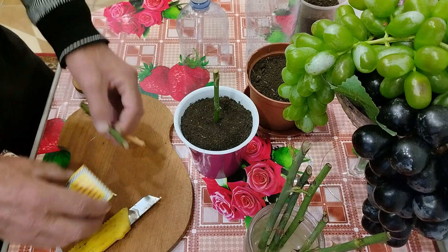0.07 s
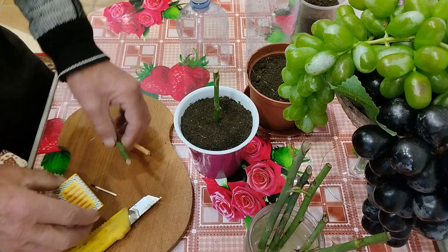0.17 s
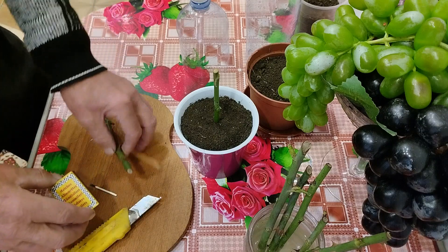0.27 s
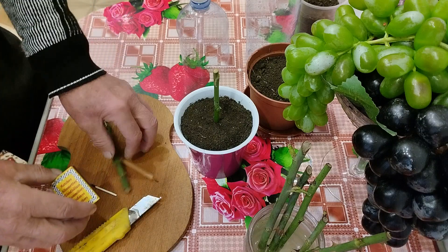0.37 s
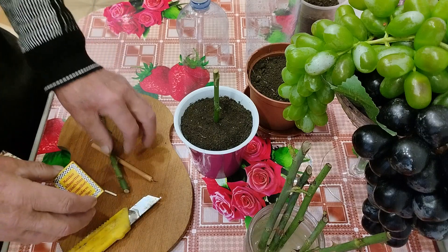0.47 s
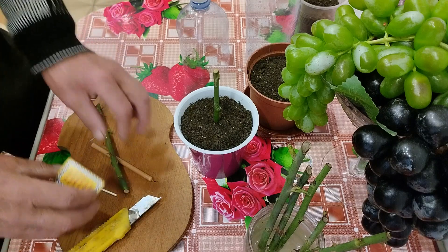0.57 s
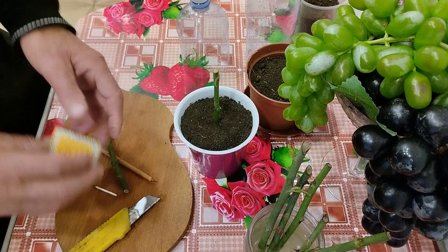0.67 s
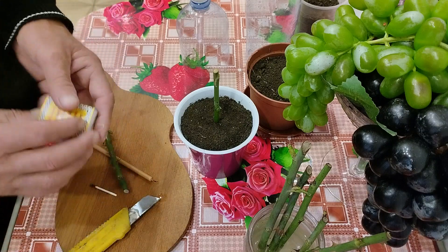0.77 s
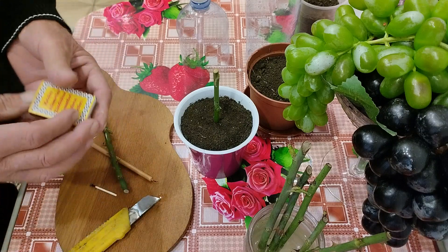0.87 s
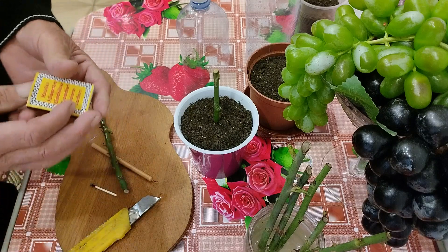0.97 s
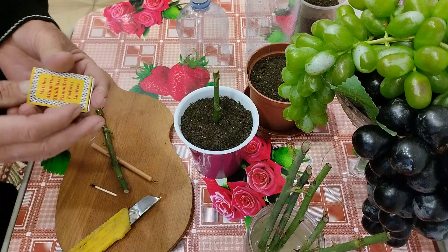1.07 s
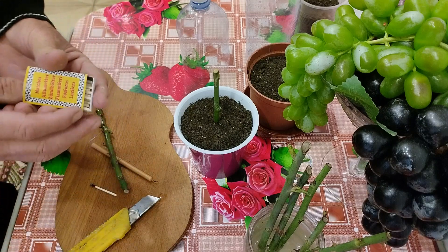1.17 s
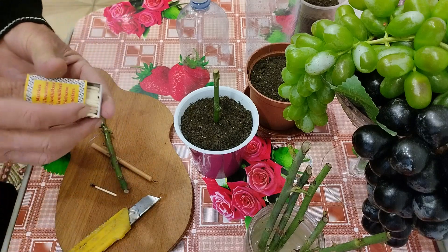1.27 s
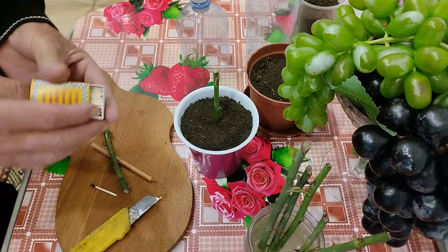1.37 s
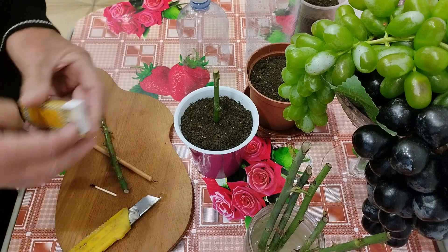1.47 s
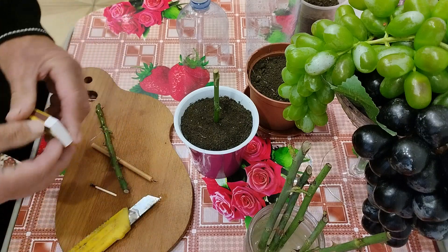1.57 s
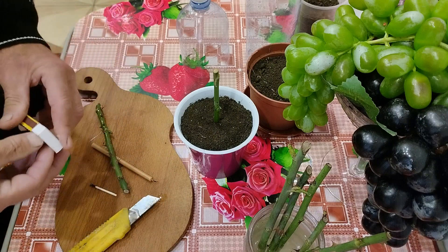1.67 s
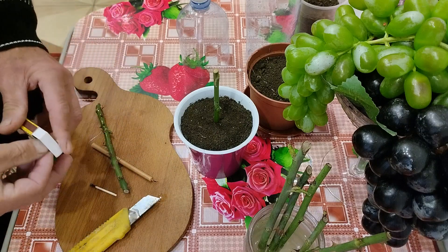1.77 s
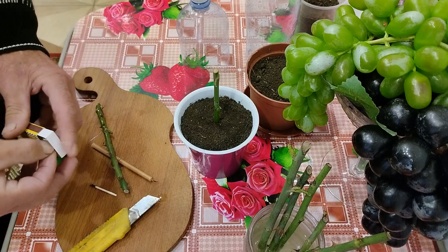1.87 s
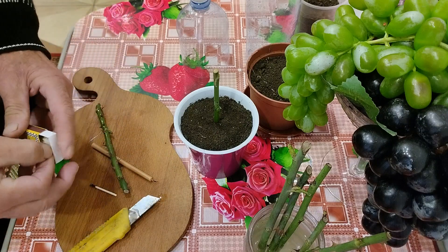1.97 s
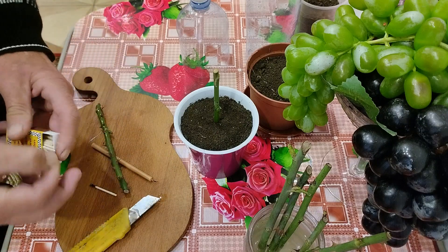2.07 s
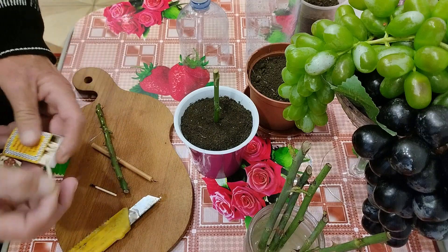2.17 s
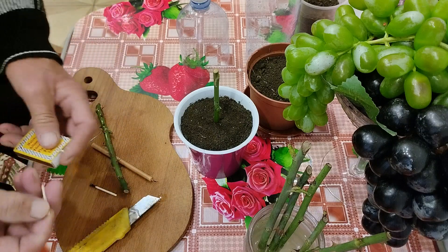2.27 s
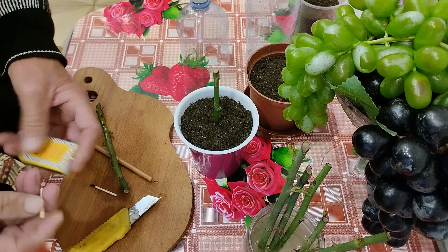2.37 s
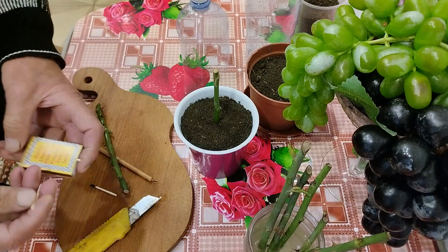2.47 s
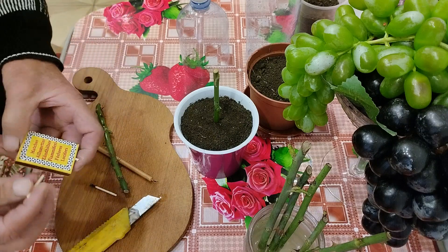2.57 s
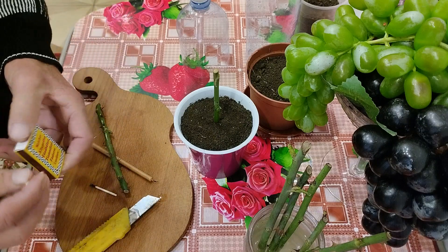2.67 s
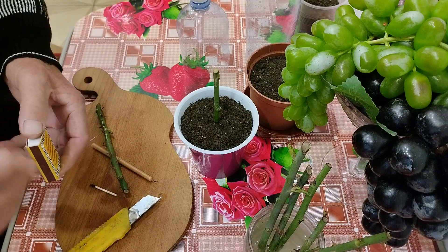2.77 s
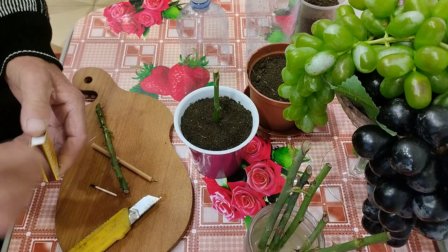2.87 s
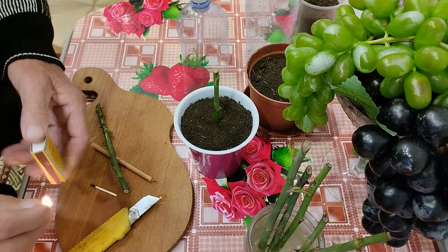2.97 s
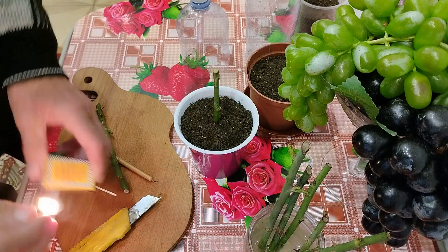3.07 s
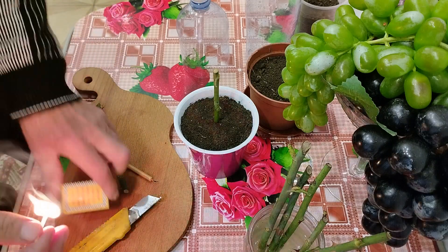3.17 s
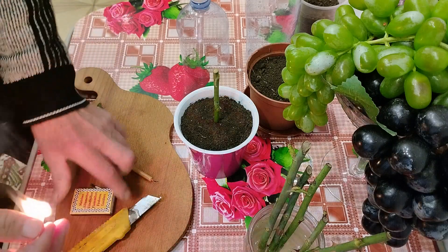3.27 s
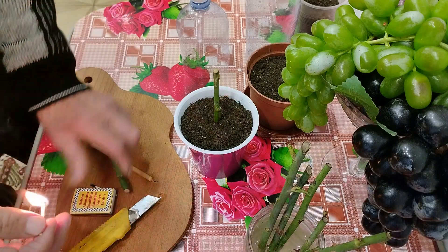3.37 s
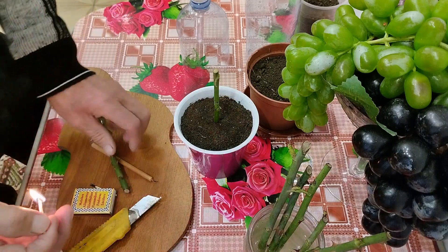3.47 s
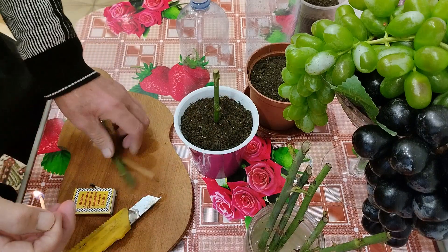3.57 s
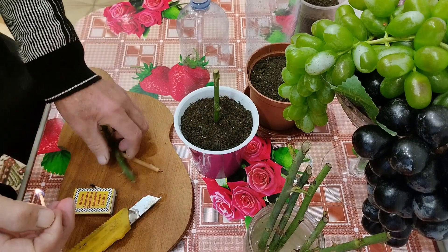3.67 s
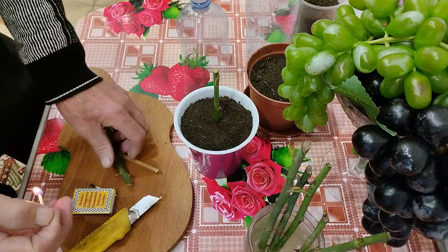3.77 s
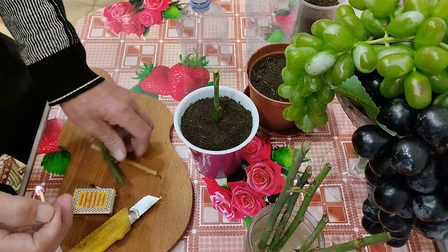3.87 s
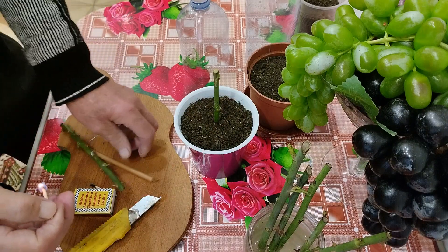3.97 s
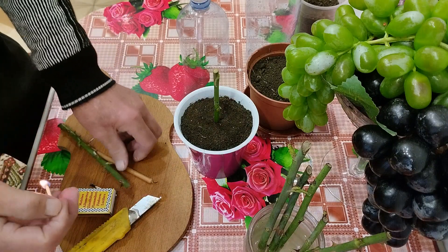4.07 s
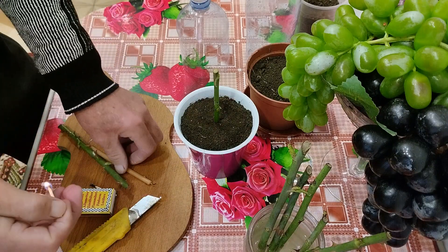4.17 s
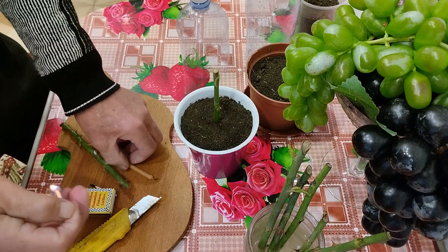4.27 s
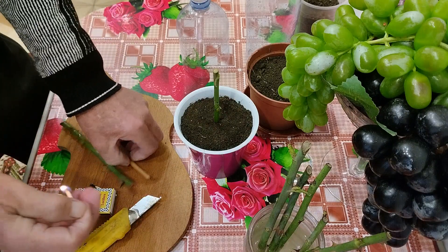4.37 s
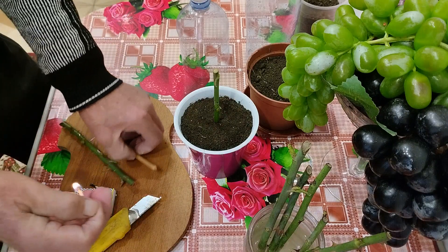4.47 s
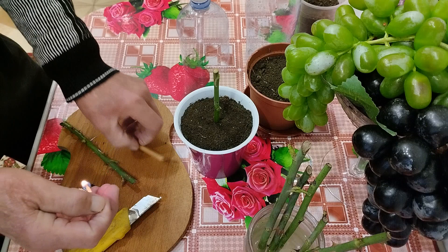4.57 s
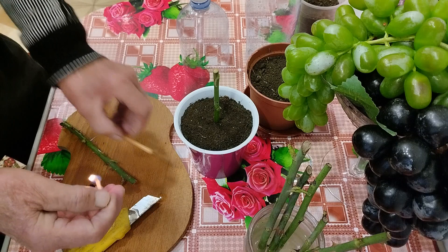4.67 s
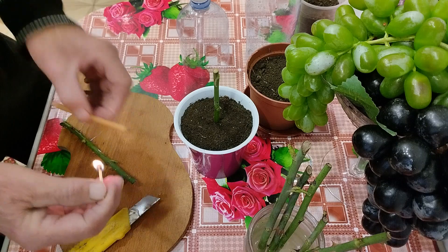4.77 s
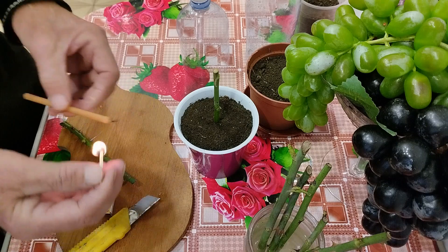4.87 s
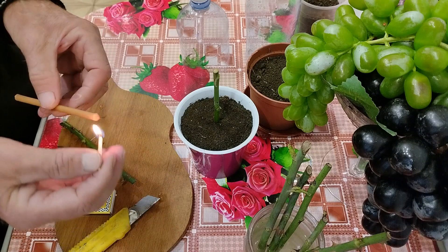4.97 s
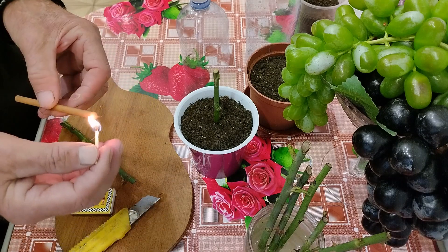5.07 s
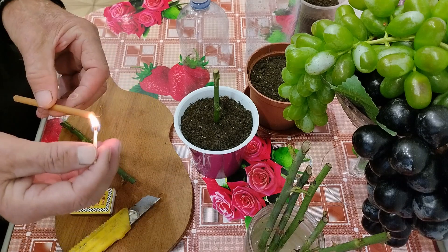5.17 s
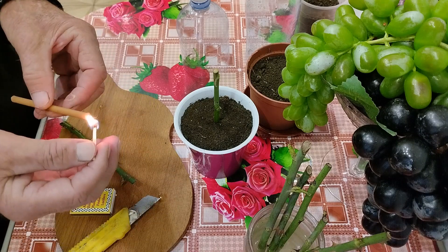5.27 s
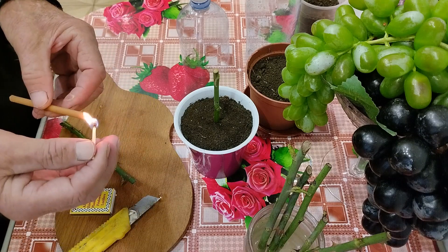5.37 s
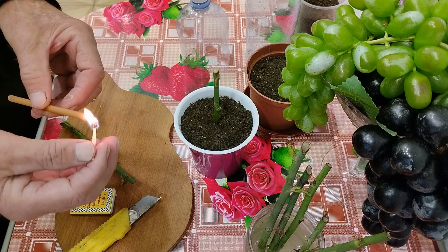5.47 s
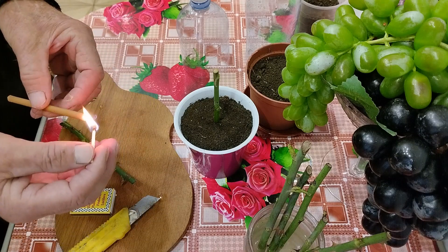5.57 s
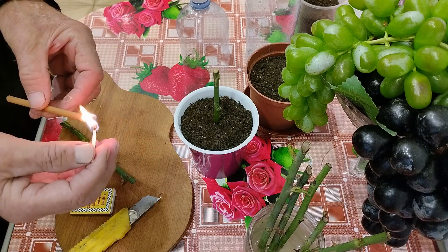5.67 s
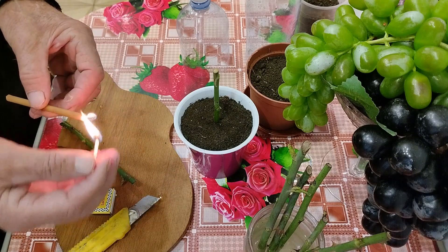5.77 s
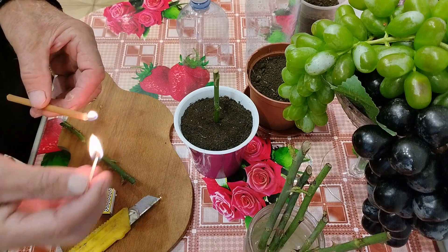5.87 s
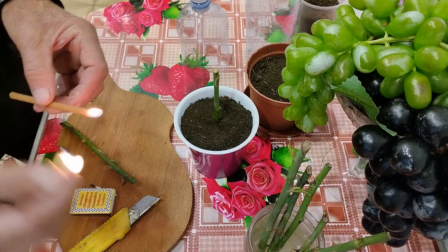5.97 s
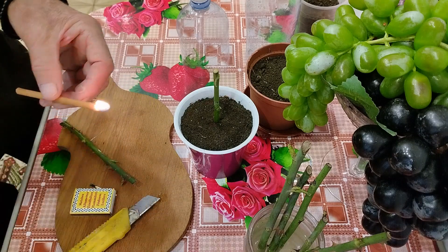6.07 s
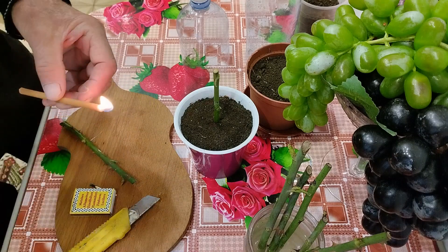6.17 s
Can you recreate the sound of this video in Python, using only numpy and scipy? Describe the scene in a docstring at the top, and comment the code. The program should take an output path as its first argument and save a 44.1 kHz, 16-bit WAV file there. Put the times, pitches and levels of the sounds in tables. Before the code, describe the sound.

Close view of a tabletop in a small quiet room, with a faint distant steady tick and low hum. A woody cutting drops and bounces on a board. A cardboard matchbox slides open, matches tick as one is picked out, and the tray clicks shut. A quick rasp and snap light the match, with a brief fizz and pop. The box lands with a sharp rattling knock, then fingers tap and brush the board, leaving near silence.

```python
"""A faint, evenly repeating far tick, perhaps a clock, runs through a small room. A vine cutting drops on a board:
decaying noise bursts through stem and board resonances; the board thuds. A matchbox slides open, a match is picked
out, the tray is pushed shut: card friction made of tiny slips, clicks and random match ticks. The match rasps,
snaps and flares as shaped friction; its wood pops in pitched bursts. The box lands with knocks and a rattle of
matches, then fingers bump and brush the board to pick up a stick. Air noise, hum and short echoes surround it all."""
import sys
import numpy as np
from scipy import signal
from scipy.fft import rfft, irfft, next_fast_len
from scipy.io import wavfile

SR = 44100
rng = np.random.default_rng(int(sys.argv[2]) if len(sys.argv) > 2 else 0)


def unload_wav(signal):
    """Save mono or channel-first audio to the path in sys.argv[1] as 16-bit WAV at rate SR, clipped to [-1, 1]."""
    wavfile.write(
        sys.argv[1],
        SR,
        np.round(np.clip(np.atleast_2d(signal).T, -1, 1) * 32767).astype(np.int16),
    )


N = 273861
TOP_HZ = 15900


def amp(db):
    """Decibels to gain."""
    return 10 ** (np.asarray(db) / 20)


def unit(x):
    """x at rms 1."""
    return x / np.sqrt(np.mean(x ** 2) + 1e-20)


def along(points, hz):
    """(frequency [Hz], value) points interpolated on a log frequency axis."""
    f, v = np.transpose(points)
    return np.interp(np.log(hz + 1), np.log(f + 1), v)


def wobble(knots_per_s, size=N):
    """Smooth random curve through normally distributed knots."""
    place = np.arange(size) * knots_per_s / SR
    knots = rng.standard_normal(int(place[-1]) + 2)
    i = place.astype(int)
    blend = np.sin((place - i) * np.pi / 2) ** 2
    return knots[i] + (knots[i + 1] - knots[i]) * blend


def body(spectrum, resonances=(), size=8192):
    """Minimum-phase impulse response of energy 1: a broad spectrum with resonances on it."""
    hz = np.fft.rfftfreq(size, 1 / SR)
    db = along(spectrum, hz)
    for centre_hz, width_hz, lift_db in resonances:
        db = db + lift_db / (1 + (2 * (hz - centre_hz) / width_hz) ** 2)
    # fold the cepstrum to make the response causal
    cepstrum = irfft(np.log(amp(db) + 1e-6))
    cepstrum[1:size // 2] *= 2
    cepstrum[size // 2 + 1:] = 0
    response = irfft(np.exp(rfft(cepstrum)))
    return response / np.linalg.norm(response)


def through(x, response):
    """x sounding through an impulse response."""
    return signal.oaconvolve(x, response)[:len(x)]


def fade(t, t60_s):
    """Exponential decay by 60 dB in t60_s."""
    return np.exp(-np.log(1000) * t / np.maximum(t60_s, 1e-4))


def add(track, s, sound):
    """Mix a sound into the track at time s."""
    part = track[max(round(s * SR), 0):][:len(sound)]
    part += sound[:len(part)]


def envelope(attack_s, hold_s, release_s):
    """Pressure builds, holds and lets go in straight lines."""
    corners_s = np.cumsum(np.abs([0, attack_s, hold_s, release_s]))
    t = np.arange(int(corners_s[-1] * SR)) / SR
    return np.interp(t, corners_s, [0, 1, 1, 0])


def strokes(rows, release_s):
    """The pressure of a series of hand strokes."""
    pressure = np.zeros(N)
    for s, attack_s, hold_s, db in rows:
        add(pressure, s, amp(db) * envelope(attack_s, hold_s, release_s))
    return pressure


def contacts(rows, bright, low, bright_db, low_db, low_stretch):
    """Each contact is a brief rough force: it clicks at the surface and knocks the body a little longer."""
    track, t = np.zeros(N), np.arange(SR // 5) / SR
    for s, click_db, knock_db, t60_s in rows:
        click = bright, click_db + bright_db, t60_s
        knock = low, knock_db + low_db, t60_s * low_stretch
        for response, db, life_s in (click, knock):
            force = fade(t, life_s)
            swell = 1 - fade(t, life_s / 2)  # surfaces give way before they push back
            sound = through(swell * force * rng.standard_normal(len(t)), response)
            add(track, s, amp(db) * sound * np.linalg.norm(force) / np.linalg.norm(sound))
    return track


def friction(s, pressure, response, slips_per_s, spread_db, smooth, flutter_db):
    """Tiny slips of random size and pitch over a smooth rub; follows the pressure from time s."""
    size = len(pressure)
    count = int(slips_per_s * size / SR) + 1
    start, pitch, chance, phase = rng.random((count, 4)).T[:, :, None]
    age = np.arange(SR // 400)
    strength = amp(spread_db * np.minimum(-np.log(1 - chance), np.pi))
    tone = np.sin(2 * np.pi * (pitch * TOP_HZ * age / SR + phase))
    grains = strength * fade(age / SR, 0.0017) * tone
    places = (start * size).astype(int) + age
    slips = np.bincount(places.ravel(), grains.ravel(), size)[:size]
    rub = unit(through(unit(slips) + smooth * rng.standard_normal(size), response))
    flutter = amp(flutter_db * wobble(70, size=size))
    track = np.zeros(N)
    add(track, s, pressure * flutter * rub)
    return track


# Noise spectrum: (frequency [Hz], relative level [dB])
AIR_SPECTRUM = [(20, -2), (45, -4), (65, -12.5), (150, -11.5), (230, -18), (380, -15), (600, -24),
                (1000, -27), (2000, -31.5), (4000, -37.5), (6500, -37), (9000, -34), (12000, -40),
                (16000, -38)]
# Hiss resonance: (centre [Hz], width [Hz], lift [dB])
HISS_RESONANCE = [(9000, 1600, 4)]


def background():
    """Still room air and microphone hiss as shaped noise, with a low wavering hum."""
    air = unit(through(rng.standard_normal(N), body(AIR_SPECTRUM, HISS_RESONANCE)))
    hum = np.sin(2 * np.pi * 48.2 * np.arange(N) / SR + .45 * wobble(10))
    return amp(-64.5) * air + amp(-65.5 + 1.4 * wobble(12)) * hum


# Room decay: (frequency [Hz], t60 [s])
ROOM_DECAY = [(150, 0.25), (1000, 0.27), (2500, .25), (8000, 0.15), (15000, 0.15)]


def room(x, count=20):
    """Short dense echoes from table and walls; a new random tail serves each equal block."""
    wet, step = np.zeros(N), N // count + 1
    for start in range(0, N, step):
        hz, t, z = signal.stft(rng.standard_normal(SR // 2), SR, nperseg=256)
        decay = fade(t, along(ROOM_DECAY, hz)[:, None])
        tail = signal.istft(z * decay, SR, nperseg=256)[1]
        echo = signal.fftconvolve(x[start:start + step], tail / np.linalg.norm(tail))
        add(wet, start / SR + 0.0022, echo)
    return wet


# Tick spectrum: (frequency [Hz], relative level [dB])
TICK_SPECTRUM = [(300, -23), (800, 2), (1300, -5.5), (2500, -9.5), (5000, -25.5)]
# Hollow case resonances: (centre [Hz], width [Hz], lift [dB])
CASE_RESONANCES = [(824, 130, 12), (1770, 310, 8.1)]
FIRST_TICK_S, TICK_PERIOD_S, TICK_DB = .262, .767, -66.5


def ticking():
    """Each far tick arrives as a dull, smeared knock of a hollow case."""
    track, t = np.zeros(N), np.arange(SR // 2) / SR
    for s in np.arange(FIRST_TICK_S, N / SR, TICK_PERIOD_S):
        add(track, s, amp(TICK_DB) * fade(t, .33) * rng.standard_normal(len(t)))
    return through(track, body(TICK_SPECTRUM, CASE_RESONANCES))


# Thud after the drop, then finger and stick bumps:
# (time [s], tap level before trim [dB], thud level before trim [dB], tap t60 [s])
BOARD_BUMPS = [(.457, -62, -51, .025), (3.6381, -41.5, -50, 0.021), (3.7213, -44, -54.5, 0.032),
               (3.755, -62, -59.5, 0.021), (4.005, -59, -56.5, 0.033), (4.19, -65, -61, .025),
               (4.385, -56.5, -72, .03), (4.485, -64, -56, .03)]
# Hand strokes on board and stick: (time [s], attack [s], hold [s], level before trim [dB])
HAND_BRUSHES = [(3.62, .025, 0.017, -57), (3.715, .012, .03, -56.5), (3.93, 0.036, .23, -62),
                (4.29, 0.057, .14, -63.5), (4.89, .025, .02, -62)]
BRUSH_RELEASE_S = 0.05
# Tap, thud and skin spectra: (frequency [Hz], relative level [dB])
TAP_SPECTRUM = [(400, -19), (900, -4), (1400, 6.5), (2200, -4.5), (4000, -20.5), (10000, -18),
                (16000, -28.5)]
THUD_SPECTRUM = [(50, -9), (140, 2), (330, -3.5), (600, -11.5), (1500, -29.5)]
SKIN_SPECTRUM = [(60, -21), (140, 0), (330, 0), (700, -11.5), (2000, -18.5), (5000, -27.5)]
# Board resonances: (centre [Hz], width [Hz], lift [dB])
BOARD_RESONANCES = [(138, 53, 7.5), (315, 100, 6.5), (1330, 120, 7.7)]


def board_bumps_and_brushing():
    """The board thuds after the drop; later, fingers bump and brush it as a stick is picked up."""
    bumps = contacts(BOARD_BUMPS, body(TAP_SPECTRUM), body(THUD_SPECTRUM, BOARD_RESONANCES),
                     bright_db=-7.5, low_db=1.5, low_stretch=2.5)
    brushing = friction(0, strokes(HAND_BRUSHES, BRUSH_RELEASE_S), body(SKIN_SPECTRUM),
                        slips_per_s=1000, spread_db=5, smooth=0.98, flutter_db=1.5)
    return bumps + amp(-9.0) * brushing


# Bounces: (time [s], click level before trim [dB], knock level before trim [dB], click t60 [s])
STEM_BOUNCES = [(.3335, -58, -55, 0.0096), (.3520, -18.3, -37.5, .012), (.3644, -39, -45, 0.015),
                (.4170, -26, -38, .0055), (.4352, -38, -47, .006)]
# Stem and board spectra: (frequency [Hz], relative level [dB])
STEM_SPECTRUM = [(1500, -16), (3000, -14), (4600, -8.5), (7000, -10.5), (9000, -2.5), (11500, -17),
                 (16000, -29)]
KNOCK_SPECTRUM = [(60, -4), (135, 0), (200, -7.5), (320, 2), (700, -8.5), (1100, 2.5), (2200, 2.5),
                  (4000, -11.5), (6000, -26.5)]
# Stem resonances: (centre [Hz], width [Hz], lift [dB])
STEM_RESONANCES = [(1360, 160, -1), (3967, 270, 7), (5890, 540, 16.5)]


def cutting():
    """The woody stem drops, bounces and settles on the board."""
    stem, board = body(STEM_SPECTRUM, STEM_RESONANCES), body(KNOCK_SPECTRUM, BOARD_RESONANCES)
    return contacts(STEM_BOUNCES, stem, board, bright_db=-5.0, low_db=3.5, low_stretch=3.7)


# Clicks on the box: (time [s], click level before trim [dB], card level before trim [dB], click t60 [s])
BOX_CLICKS = [(.1545, -41.5, -53, 0.0044), (1.354, -36, -64, .003), (1.563, -35.5, -48, 0.0034),
              (1.6645, -18, -30, 0.01), (1.669, -42, -57, 0.14), (1.802, -37, -54, 0.0051),
              (1.825, -29, -62, 0.0044), (1.866, -19, -41, 0.0077), (2.0206, -33.5, -61, 0.0053),
              (2.067, -25.5, -53, .012), (2.163, -34, -67, 0.0031), (2.312, -28, -52, .013),
              (2.563, -44.5, -51.5, 0.013), (2.681, -37, -47, 0.014), (2.801, -49, -49.5, 0.011),
              (2.824, -51, -45, .013), (2.907, -56, -51, 0.0093), (2.930, -41, -45, 0.0054)]
# Card on card and skin: (time [s], attack [s], hold [s], level before trim [dB])
CARD_SLIDES = [(.773, .018, .008, -55), (.822, 0.013, .003, -53.5), (.87, .02, 0.095, -69),
               (1.075, 0.032, 0.064, -65), (1.19, .09, 0.018, -55.5), (1.376, 0.013, .08, -52.5),
               (1.49, .02, .13, -58.5), (1.755, 0.0095, .05, -55), (1.835, .03, .04, -53),
               (1.97, 0.045, 0.089, -54.5), (2.14, 0.026, 0.046, -58.5), (2.274, .018, .005, -41.5),
               (2.36, 0.027, 0.0019, -60), (2.525, .025, .015, -58), (2.62, 0.047, 0.023, -57),
               (2.79, .04, 0.057, -64.5)]
SLIDE_RELEASE_S = 0.038
# Card click, body and rub spectra: (frequency [Hz], relative level [dB])
CARD_CLICK_SPECTRUM = [(1000, -38), (3000, -8), (5000, -6.5), (7000, -3), (8600, 1), (11000, -10.5),
                       (16000, -18)]
CARD_BODY_SPECTRUM = [(200, -26), (700, -18), (1300, -13.5), (1800, -1.5), (2500, -8), (3200, -9.5),
                      (6000, -25.5)]
CARD_RUB_SPECTRUM = [(290, -52.5), (500, -17), (1180, -11.5), (1420, -6), (1670, -6.5), (2190, -4),
                     (2930, -8), (4210, -4), (5470, -6), (9090, 0), (15100, -15), (16000, -24)]
# Card resonances: (centre [Hz], width [Hz], lift [dB])
CARD_RESONANCES = [(2530, 400, 4), (7700, 900, 3.7), (9100, 700, 3)]


def handling():
    """The tray slides, matches are fingered, and the box is pushed shut and turned over."""
    rub = friction(0, strokes(CARD_SLIDES, SLIDE_RELEASE_S), body(CARD_RUB_SPECTRUM, CARD_RESONANCES),
                   slips_per_s=1000, spread_db=2.5, smooth=0.75, flutter_db=1.86)
    surface = body(CARD_CLICK_SPECTRUM, CARD_RESONANCES)
    card = body(CARD_BODY_SPECTRUM, CARD_RESONANCES)
    clicks = contacts(BOX_CLICKS, surface, card, bright_db=-6, low_db=2.5, low_stretch=1.3)
    return clicks + amp(-1.5) * rub


# Match click spectrum: (frequency [Hz], relative level [dB])
MATCH_SPECTRUM = [(1000, -40), (3000, -17), (5000, -10.5), (7000, -2), (8600, 2), (11000, -9), (16000, -19)]
PICK_START_S, PICK_END_S, PICK_TICKS_PER_S = 1.5, 2.25, 24
PICK_LOW_HZ, PICK_HIGH_HZ, PICK_WIDTH_HZ, PICK_LIFT_DB = 3500, 14500, 1000, 13
# levels before trim; t60 of the click
PICK_DB, PICK_SPREAD_DB, PICK_CARD_DB, PICK_T60_S = -38.5, 2.2, -60.5, 0.0051


def picking():
    """Loose matches touch at uneven moments, each with its own strength and pitch."""
    track, card = np.zeros(N), body(CARD_BODY_SPECTRUM, CARD_RESONANCES)
    for slot_s in np.arange(PICK_START_S, PICK_END_S, 1 / PICK_TICKS_PER_S):
        s = slot_s + rng.random() / PICK_TICKS_PER_S
        db = PICK_DB + PICK_SPREAD_DB * rng.standard_normal()
        pitch_hz = rng.uniform(PICK_LOW_HZ, PICK_HIGH_HZ)
        splint = body(MATCH_SPECTRUM, [(pitch_hz, PICK_WIDTH_HZ, PICK_LIFT_DB)])
        track += contacts([(s, db, PICK_CARD_DB, PICK_T60_S)], splint, card,
                          bright_db=-6, low_db=2, low_stretch=1.3)
    return track


# Impacts: (time [s], click level before trim [dB], box level before trim [dB], click t60 [s])
BOX_IMPACTS = [(3.3023, -20, -31.5, 0.01), (3.3191, -17, -36, 0.0065), (3.3227, -2.5, -29, .005),
               (3.3281, -17.5, -33, .006), (3.3323, -19, -34.5, 0.0064)]
# Box and loose-match spectra: (frequency [Hz], relative level [dB])
BOX_SPECTRUM = [(70, -24.5), (170, -9.5), (280, -6), (500, -9.5), (900, -3.5), (1500, -1), (2500, 1),
                (4500, -6.5), (8000, -26)]
RATTLE_SPECTRUM = [(60, -22), (160, -13.5), (280, -5), (500, -12.5), (850, -10), (1200, -15), (1600, -7.5),
                   (3000, -12), (6000, -6.5), (8300, -2), (10500, -6), (12500, -12), (16000, -25.5)]
# Box resonances: (centre [Hz], width [Hz], lift [dB])
BOX_RESONANCES = [(2080, 290, 12.5), (3659, 420, 5), (4450, 610, 4), (8100, 790, 3.8), (8760, 400, 8.8)]
RATTLE_S, RATTLE_DB = 3.301, -26.8
RATTLE_ATTACK_S, RATTLE_HOLD_S, RATTLE_RELEASE_S = .021, .009, .051


def landing():
    """The box falls on an edge, then flat; the matches inside rattle on."""
    surface, box = body(MATCH_SPECTRUM, BOX_RESONANCES), body(BOX_SPECTRUM, BOX_RESONANCES)
    knocks = contacts(BOX_IMPACTS, surface, box, bright_db=-4.0, low_db=-1, low_stretch=3)
    jostle = envelope(RATTLE_ATTACK_S, RATTLE_HOLD_S, RATTLE_RELEASE_S)
    rattle = friction(RATTLE_S, jostle, body(RATTLE_SPECTRUM, BOX_RESONANCES),
                      slips_per_s=2800, spread_db=0.5, smooth=0.51, flutter_db=2.5)
    return knocks + amp(RATTLE_DB) * rattle


# Gas bursts: (time [s], peak level [dB], pitch [Hz])
WOOD_POPS = [(3.127, -35, 8620), (4.903, -45, 8700), (5.6497, -49.5, 13000), (6.095, -51, 3700)]
# Pop spectrum: (frequency [Hz], relative level [dB])
POP_SPECTRUM = [(1000, -22), (2500, -9), (5000, -6), (9000, -2), (16000, -6)]
POP_T60_S, POP_WIDTH_HZ, POP_LIFT_DB = .011, 2000, 11


def pops():
    """Pockets of gas burst in the burning wood, each at its own pitch."""
    track, t = np.zeros(N), np.arange(SR // 20) / SR
    for s, db, pitch_hz in WOOD_POPS:
        burst = fade(t, POP_T60_S) * rng.standard_normal(len(t))
        pop = through(burst, body(POP_SPECTRUM, [(pitch_hz, POP_WIDTH_HZ, POP_LIFT_DB)]))
        add(track, s, amp(db) * pop / np.abs(pop).max())
    return track


# Flame spectrum: (frequency [Hz], relative level [dB])
FLAME_SPECTRUM = [(120, -24.5), (250, -4), (700, -12), (1400, -4), (2200, -10.5), (4200, -10),
                  (6500, -10.5), (8500, -3), (10500, -8.5), (13000, -15.5), (16000, -20.5)]
STRIKE_S = 2.9385
FLARE_DELAY_S, FLARE_DB = .025, -55.5  # delay from STRIKE_S
FLARE_ATTACK_S, FLARE_HOLD_S, FLARE_RELEASE_S = .11, .2, .24


def flare():
    """Gas fizzes out of the burning head."""
    flow = envelope(FLARE_ATTACK_S, FLARE_HOLD_S, FLARE_RELEASE_S)
    fizz = friction(STRIKE_S + FLARE_DELAY_S, flow, body(FLAME_SPECTRUM, HISS_RESONANCE),
                    slips_per_s=2800, spread_db=4.0, smooth=.7, flutter_db=2.2)
    return amp(FLARE_DB) * fizz


# Head catching on grit: (time [s], click level before trim [dB], box level before trim [dB], click t60 [s])
HEAD_SNAPS = [(2.9461, -20.5, -47.5, .004), (2.9492, -22, -37, .004), (2.9595, -6.5, -41, 0.0034),
              (2.9653, -9.5, -42, .003)]
# Striking strip spectrum: (frequency [Hz], relative level [dB])
GRIT_SPECTRUM = [(70, -40), (170, -20.5), (400, -24), (650, -31), (830, -24), (1050, -27.5), (1450, -15),
                 (2300, -25), (4400, -16.5), (5700, -19), (8800, -5.5), (11500, -15), (16000, -21.5)]
STRIKE_DB = -28.5
STRIKE_ATTACK_S, STRIKE_HOLD_S, STRIKE_RELEASE_S = .007, .018, .037


def strike():
    """The head rasps over the strip and snaps as it ignites."""
    pressure = envelope(STRIKE_ATTACK_S, STRIKE_HOLD_S, STRIKE_RELEASE_S)
    rasp = friction(STRIKE_S, pressure, body(GRIT_SPECTRUM),
                    slips_per_s=3900, spread_db=5.0, smooth=0.71, flutter_db=2)
    snaps = contacts(HEAD_SNAPS, body(MATCH_SPECTRUM, CARD_RESONANCES), body(BOX_SPECTRUM),
                     bright_db=-8, low_db=1.5, low_stretch=3)
    return snaps + amp(STRIKE_DB) * rasp


def scene():
    """All but the background share one room; match and landing box get less echo than the rest."""
    table = cutting() + handling() + picking() + board_bumps_and_brushing() + ticking()
    match = strike() + flare() + pops()
    box = landing()
    echoes = room(amp(-4.0) * table + amp(-9.0) * match + amp(-11.0) * box)
    return (table + match + box + echoes + background())[None]


def record(dry):
    """Sharp band limit at TOP_HZ."""
    size = next_fast_len(N + SR // 2)
    keep = np.fft.rfftfreq(size, 1 / SR) < TOP_HZ
    return irfft(rfft(dry, size) * keep, size)[..., :N]


dry = scene()
out = record(dry)
unload_wav(out)
```